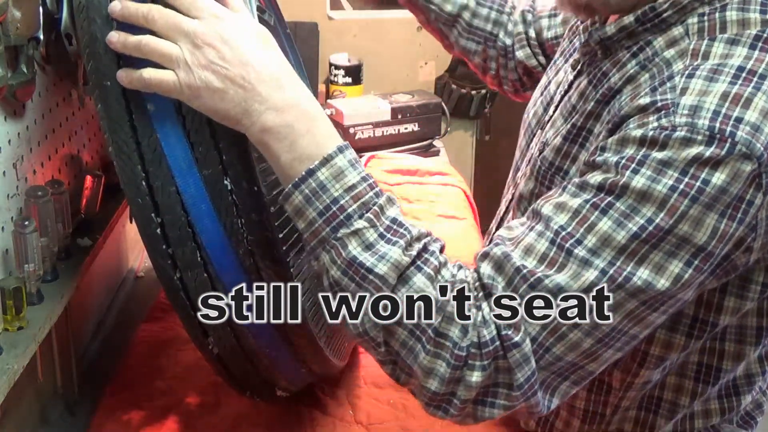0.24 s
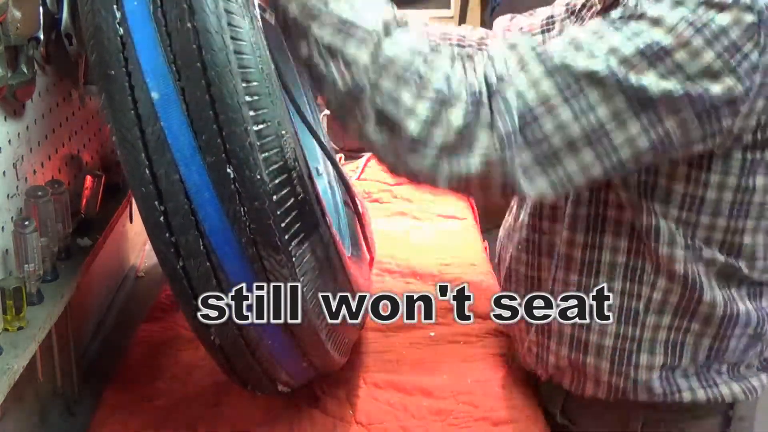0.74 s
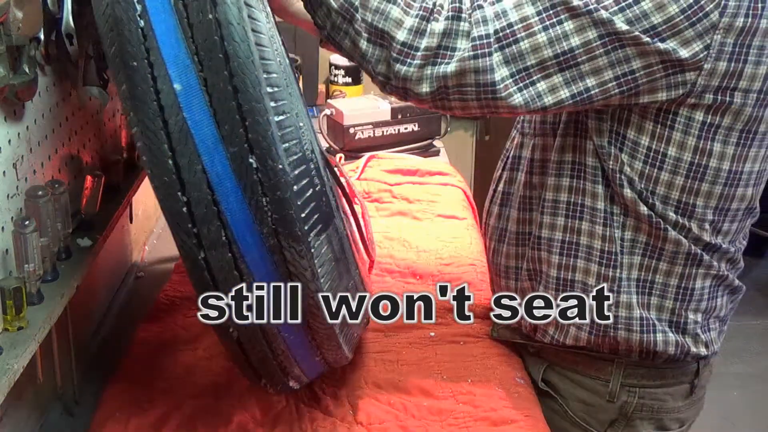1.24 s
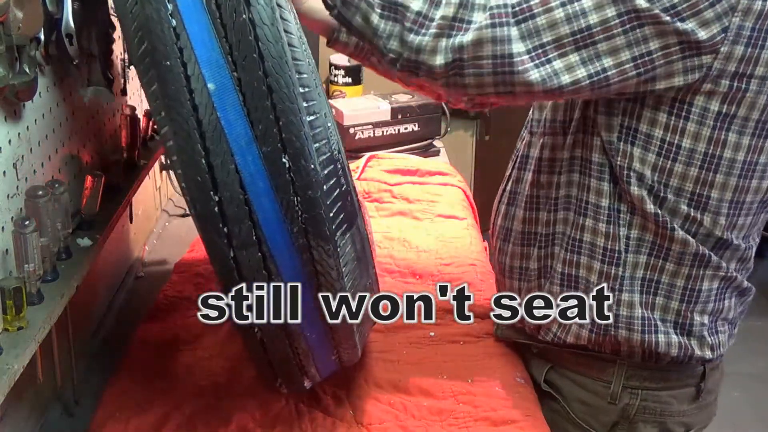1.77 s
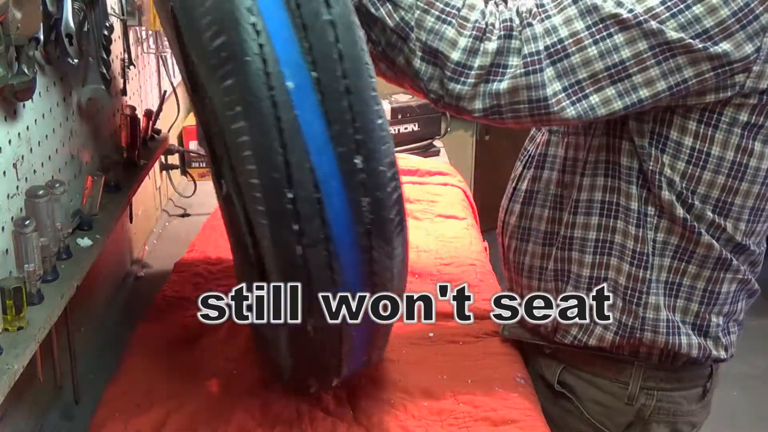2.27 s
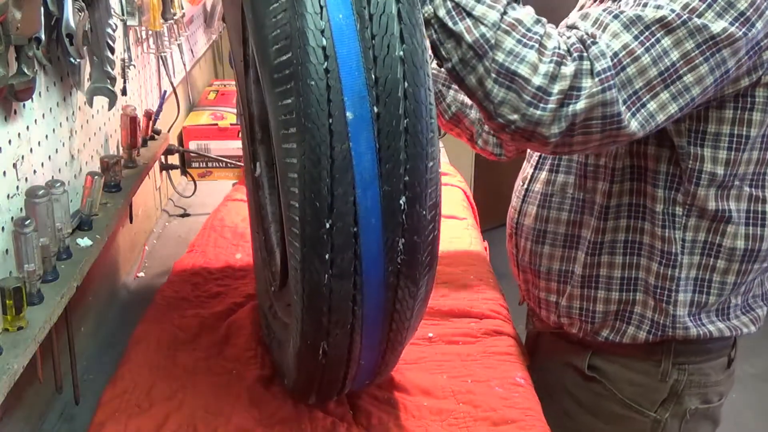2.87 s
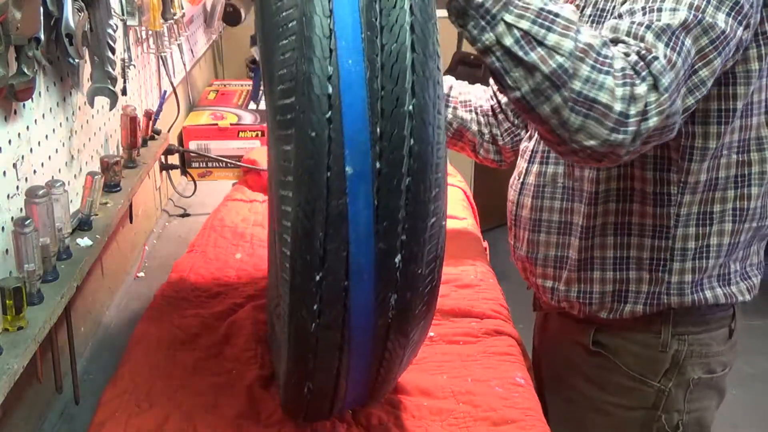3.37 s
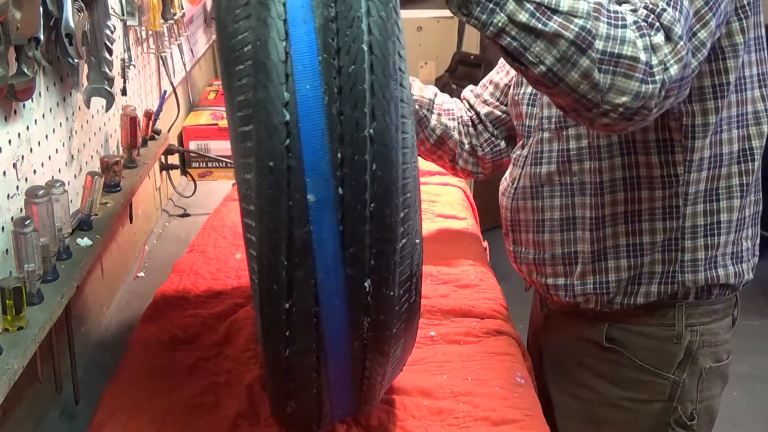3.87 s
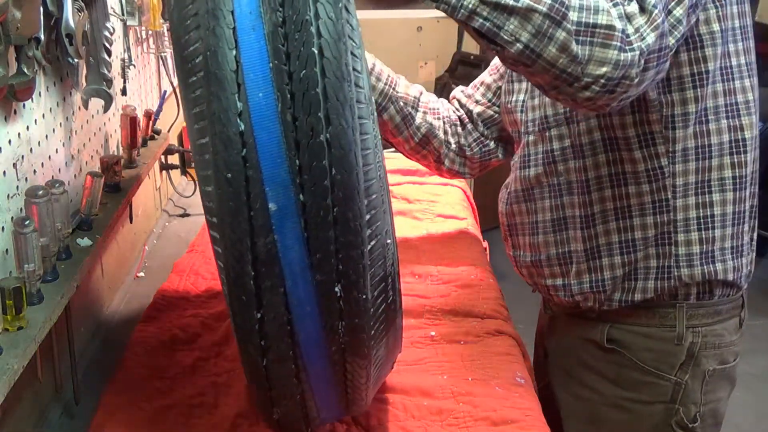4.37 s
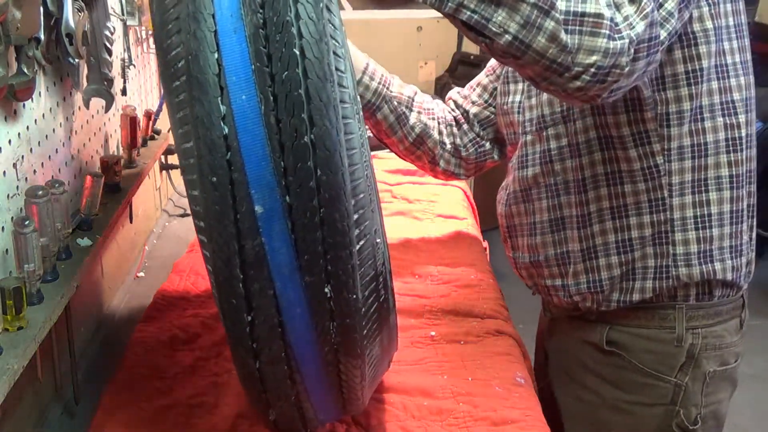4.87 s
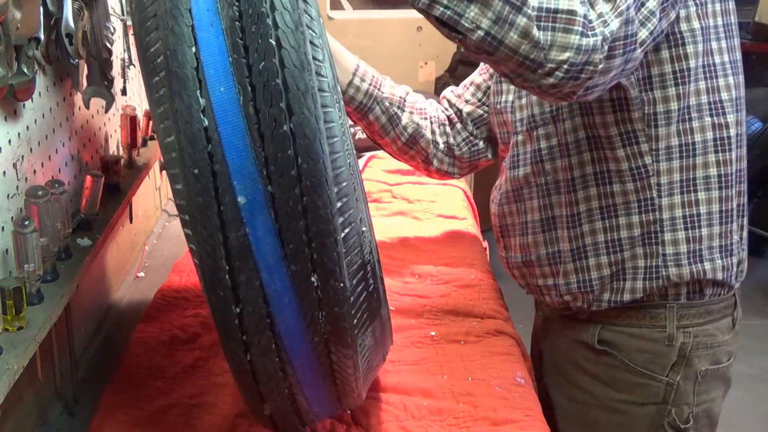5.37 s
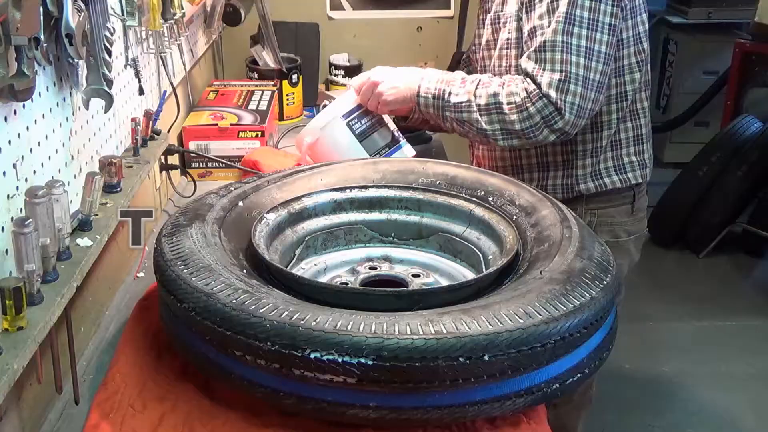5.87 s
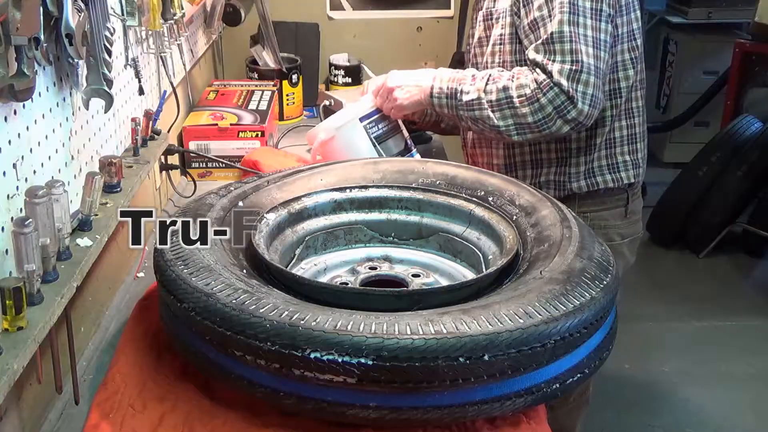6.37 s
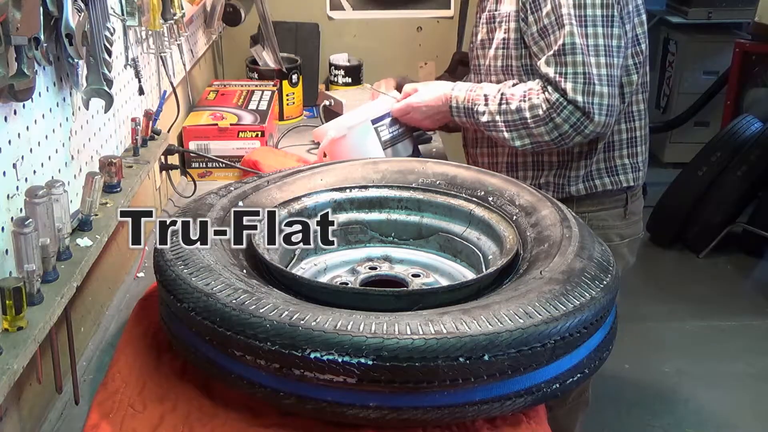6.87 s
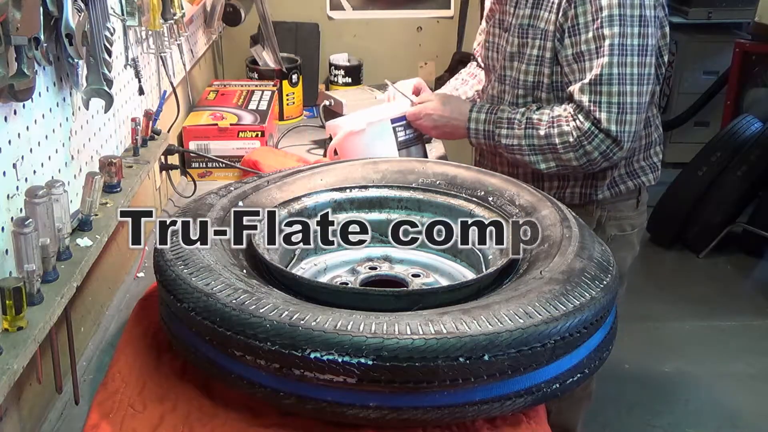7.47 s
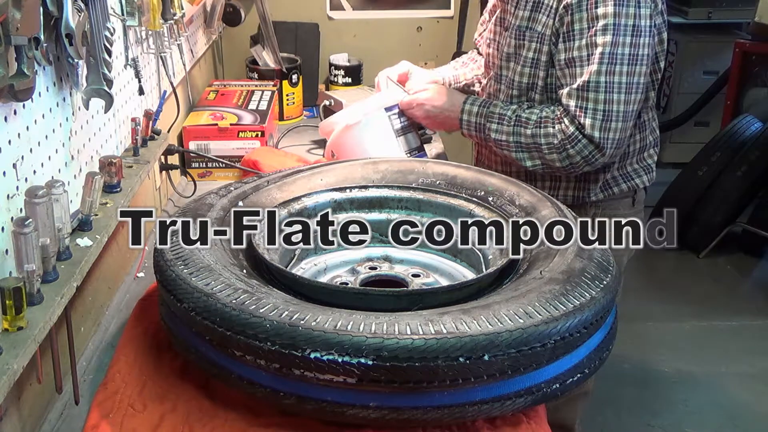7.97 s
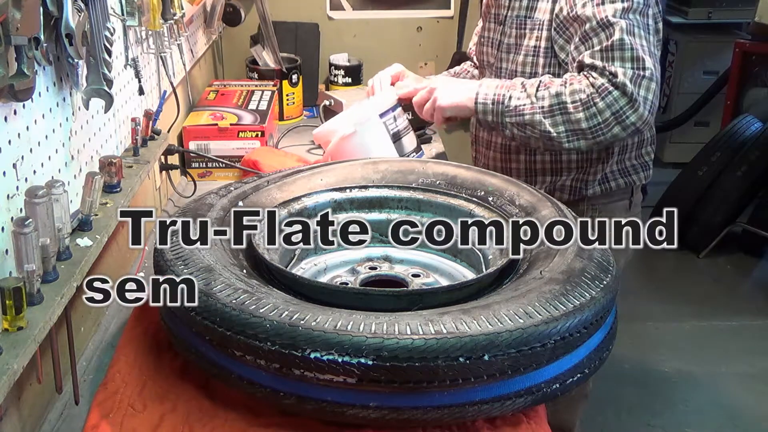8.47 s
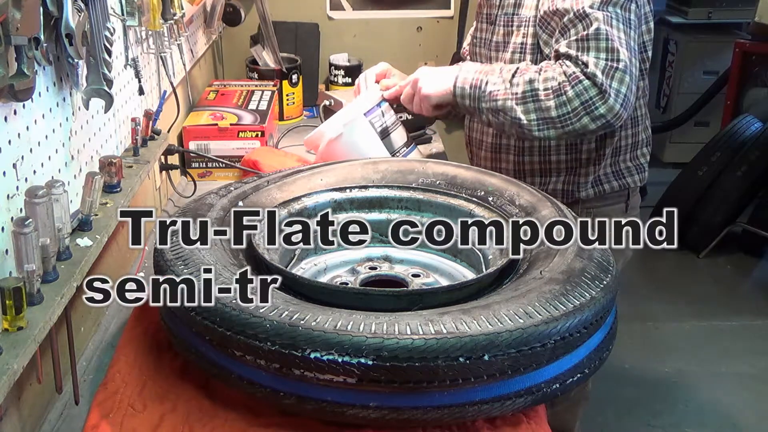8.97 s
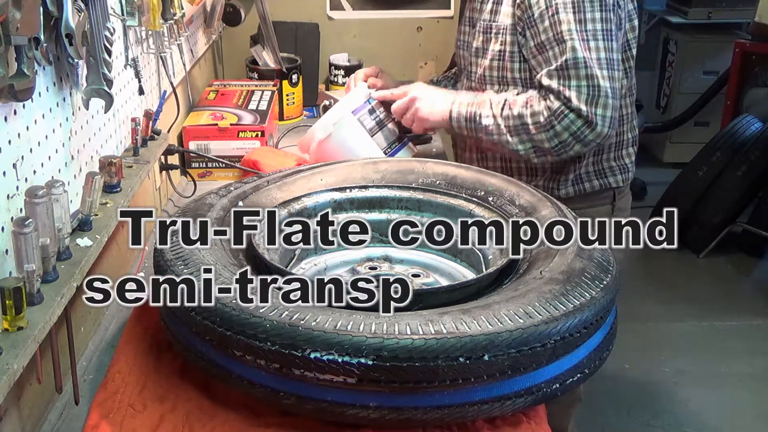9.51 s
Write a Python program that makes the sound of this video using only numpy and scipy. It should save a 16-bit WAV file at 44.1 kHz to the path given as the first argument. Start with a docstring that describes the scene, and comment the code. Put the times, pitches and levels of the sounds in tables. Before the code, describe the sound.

A piston pump inflating a tyre fills the first six seconds with fast hammering drone, harsh rattle and high piercing squeaks, nearly constant in level. It breaks off almost instantly. The quiet workshop remains: soft air, mains hum, faint thin electronic whine. Hollow plastic ticks and light rubbing follow, then a loud crack with a puff of air, and later scattered clicks and muffled thuds, picked up fairly close in slight stereo width.

```python
"""First a small piston air compressor pumps up a tyre on a garage workbench: a drone, a clatter and squeals,
all computed from one crank, whose turns knock the housing, rattle the drive and make the pump squeal.
It breaks off abruptly; in the quiet garage a plastic bottle is handled, with clicks, rubs and soft bumps made
of shaped noise and tones, and one loud snap and hiss. Behind it all lie soft air, mains hum and a faint
electrical whine. Reflections give the two channels their width, and the recorder cuts the top."""
import sys
import numpy as np
from scipy import signal
from scipy.fft import rfft, irfft, next_fast_len
from scipy.io import wavfile
from scipy.ndimage import uniform_filter1d

SR = 44100
rng = np.random.default_rng(int(sys.argv[2]) if len(sys.argv) > 2 else 0)


def int16_out(signal):
    """Quantize to a 16-bit WAV file."""
    q = np.round(np.clip(np.atleast_2d(signal).T, -1, 1) * 32767)
    wavfile.write(sys.argv[1], SR, q.astype(np.int16))


N = 429534
T = np.arange(N) / SR

# housing drone: (multiple of the crank rate, relative level [dB])
DRONE_HARMONICS = [(1, -31), (2, -7), (3, -18), (4, -20), (5, -19), (6, -9), (7, -10.5), (8, 2), (9, -1),
                   (10, -9.5), (11, 1), (12, 0), (13, -8), (14, -4.5), (15, -15), (16, -1.5), (17, -15),
                   (18, -14), (19, -35), (20, -11.5), (21, -26), (22, -9.5), (23, -15.5), (24, -16.5)]
# knocks of piston and valves within a turn: (crank angle [turns], relative level [dB])
KNOCKS = [(.11, -0.5), (0.369, -9.5), (0.749, -6), (.85, -1.5)]
# squeaks within a turn: (nominal pitch [Hz], crank angle [turns], swell width [turns], relative level [dB])
LOW_SQUEAKS = [(2504, 0.47, 0.68, -6.5), (2581, 0.24, 0.24, -2), (2539, 0.613, 0.12, 2.5),
               (2376, 0.22, 0.085, -4), (2640, 0.92, 0.033, -6), (2185, 0.69, 0.14, -17.5)]
MID_SQUEAKS = [(7390, 0.28, 0.15, -7.5), (7724, 0.32, 0.1, 1), (7874, 0.605, 0.07, -2.5),
               (5040, 0.54, 0.1, -7), (3540, 0.9, 0.085, -11)]
HIGH_SQUEAKS = [(10220, 0.556, 0.041, 1.5), (10236, 0.48, 0.16, 0)]
TOP_SQUEAKS = [(12780, .37, 0.06, 0), (4975, .58, 0.1, -6)]
# course of the low squeal: (time [s], level [dB])
LOW_SQUEAL_LEVEL = [(0.0, -26), (0.44, -23.5), (1.15, -29), (1.5, -25), (2.05, -29.5), (2.5, -25),
                    (2.9, -27.5), (5.88, -27.5)]
# colour of the clatter: (frequency [Hz], relative level per Hz [dB])
CLATTER_COLOUR = [(30, -18), (170, -11), (280, -3), (450, 3.5), (830, 2), (980, -4.5), (1400, -3),
                  (1750, -6), (2300, 2), (3000, -2.5), (4300, -6), (6500, -6), (7800, 0), (12500, -2.5),
                  (13500, -5.5), (16000, -17)]
# ringing metal parts: (frequency [Hz], width [Hz], mean gain [dB])
METAL_PARTS = [(2178, 47, -3), (3566, 170, -2.5), (5000, 400, -3.5), (7430, 38, 3), (10140, 400, 3.5),
               (10800, 87, -2.5), (11600, 21, 8.5)]
# clicks of the plastic: (time [s], relative level [dB], pitch [Hz], ring t60 [s], rise [s],
# ring of the whole bottle [dB])
CLICKS = [(6.245, -43, 6000, .08, .0005, -8), (6.71, -44, 3500, .08, .001, -6),
          (7.0667, -27, 3700, 0.039, .0001, -13), (7.079, -21.5, 3600, 0.077, .0002, -15),
          (7.3205, -39.5, 3800, .06, .0002, -4), (8.658, -31, 2420, .12, .0002, -9),
          (8.863, -41, 3000, .09, .0003, 1), (9.1085, -27, 4300, 0.12, .0002, 1.5),
          (9.171, -32.5, 2600, 0.14, .0005, -2), (9.187, -32, 1700, .1, .001, -5),
          (9.318, -36, 2820, 0.083, .002, 2), (9.328, -37.5, 4600, .1, .001, 5.5),
          (9.558, -43, 4400, .04, .0005, -12), (9.624, -29, 2400, 0.11, 0.0033, 1.5)]
# the hollow bottle's resonances: (frequency [Hz], nominal width [Hz], relative level [dB])
BOTTLE_MODES = [(660, 88, 5.5), (1530, 200, 1), (2150, 270, 0), (3000, 380, 0), (4720, 628, -1.5),
                (6900, 1400, -5.5), (10800, 1900, -4.5)]
# bumps on the bench: (time [s], relative level [dB], nominal upper edge [Hz], thud t60 [s],
# boom of the bench top [dB])
BUMPS = [(5.926, -44, 600, 0.14, 0), (7.117, -50, 220, 0.19, 1), (7.644, -46, 400, .3, 1.5),
         (8.868, -54, 500, 0.21, -2), (9.118, -48, 130, .2, 8), (9.186, -37, 700, 0.18, -7),
         (9.32, -39.5, 280, 0.22, 3), (9.621, -34.5, 480, 0.15, -3)]
# rubs of hand and sleeve: (time of the middle [s], level [dB], half-length [s], pitch [Hz])
RUBS = [(6.254, -64, .05, 3000), (6.705, -69, .03, 3000), (7.062, -51, 0.023, 3900),
        (7.086, -45, 0.012, 3500), (7.129, -50.5, 0.034, 2170), (7.23, -61, .03, 8000),
        (8.028, -58, .025, 2800), (8.165, -55, 0.022, 3800), (9.55, -62, 0.098, 7050)]
# colour of the escaping air: (frequency [Hz], relative level per Hz [dB])
HISS_COLOUR = [(59, -36), (100, -3), (132, -17), (206, -28), (328, -9), (442, -21), (502, -18), (1100, -10),
               (1310, -15.5), (2800, -0.5), (6150, 3), (13800, -13), (16000, -44)]
# colour of the quiet garage's air: (frequency [Hz], relative level per Hz [dB])
QUIET_COLOUR = [(15, -40), (25, -6), (240, -5), (410, -6.5), (722, -6), (2360, -10), (3170, -9.5),
                (6920, -16.5), (11800, -15.5), (14300, -22), (15500, -18)]
# mains hum: (frequency [Hz], rms level [dB])
HUM = [(120, -75), (240, -71), (360, -74.5), (720, -73), (840, -84), (960, -76)]
# reflections that differ between the channels: (frequency [Hz], side gain [dB])
WIDTH = [(60, -33), (110, -5), (200, -10), (380, -11), (700, -7), (1290, -5.5), (2380, -8.5), (4400, -7.5),
         (8120, -11.5), (15000, -13.5)]

STOP_S = 5.897
MAINS_HZ = 60
# the crank creeps up to full speed: turns per second, shortfall at first, time constant
CRANK_HZ, CRANK_LAG_HZ, SETTLE_S = 37.985, 0.12, 2.2
# housing drone and clatter at the start; both ease slightly as the pump runs
DRONE_DB, CLATTER_DB, EASE_DB_PER_S = -25.1, -20.5, 0.1044
# the middle squeal builds up and dies back around a peak
MID_PEAK_S, MID_PEAK_DB, MID_RISE_DB_PER_S, MID_FALL_DB_PER_S = 3.5, -31, 1.4, 3.5
# the high squeal: level, dB gained per dB the low squeal loses, growth as the pump runs
HIGH_SQUEAL_DB, SQUEAL_TRADE, HIGH_GROWTH_DB_PER_S = -27, 0.4, 0.6
# the top squeal catches for one spell: from, until, level then, level otherwise, time to catch
TOP_FROM_S, TOP_UNTIL_S, TOP_SPELL_DB, TOP_IDLE_DB, TOP_CATCH_S = 0.85, 2.4, -32.3, -41.5, 0.25
# the bottle's snap: time, level of each tone at the onset
SNAP_S, SNAP_DB = 7.6268, -8
# the hiss after the snap: level before dulling, hold, then fall
HISS_DB, HISS_HOLD_S, HISS_FALL_DB_PER_S = -21.5, 0.041, 315
QUIET_DB = -59
TOP_HZ = 16000


def undb(db):
    """Decibels to gain."""
    return 10 ** (np.asarray(db) / 20)


def unit(x):
    """Scale to rms 1."""
    return x / np.sqrt(np.mean(x ** 2))


def curves(table):
    """Each column of a table, joined by straight lines in time."""
    s, *columns = np.transpose(table)
    return [np.interp(T, s, c) for c in columns]


def colour(x, points):
    """Filter by a spectrum of (frequency [Hz], gain [dB]) points."""
    size = next_fast_len(len(x))
    hz, db = np.transpose(points)
    f = np.maximum(np.fft.rfftfreq(size, 1 / SR), 1)
    gain = undb(np.interp(np.log(f), np.log(hz), db))
    return irfft(rfft(x, size) * gain, size)[:len(x)]


def ring(x, hz, width):
    """One resonance, gain 1 at its centre."""
    hz = min(hz, SR / 2 - 1000)
    sharpness = hz / min(width, SR / np.pi)
    return signal.lfilter(*signal.iirpeak(hz, sharpness, fs=SR), x)


def ring_twice(x, hz, width):
    """The same resonance passed twice, for steeper flanks."""
    return ring(ring(x, hz, width), hz, width)


def noise(size=N):
    """White noise."""
    return rng.standard_normal(size)


def walk(rate):
    """Smooth chance with spread near 1, changing rate times a second."""
    step = int(SR / rate)
    knots = noise(N // step + 2)
    path = np.interp(np.arange(N) / step, np.arange(len(knots)), knots)
    return uniform_filter1d(path, step // 2) * np.sqrt(2)


def window(turns, angle, length):
    """A smooth swell once a turn around an angle."""
    offset = (turns - angle + .5) % 1 - .5
    return np.exp(-.5 * (offset / length) ** 2)


def add(track, s, x):
    """Mix a short sound in at time s."""
    i = int(s * SR)
    track[i:i + len(x)] += x[:N - i]


def compressor():
    """Drone, clatter and squeals all follow the crank."""
    turns = crank()
    body = undb(DRONE_DB) * drone(turns) + undb(CLATTER_DB) * clatter(turns)
    out = undb(-EASE_DB_PER_S * T) * body

    low_db, = curves(LOW_SQUEAL_LEVEL)
    out += undb(low_db) * squeal(turns, LOW_SQUEAKS, drift=0.72, rough=0.17, waver_db=0.5)

    mid_loss = np.maximum(MID_RISE_DB_PER_S * (MID_PEAK_S - T), MID_FALL_DB_PER_S * (T - MID_PEAK_S))
    mid_db = MID_PEAK_DB - mid_loss
    out += undb(mid_db) * squeal(turns, MID_SQUEAKS, drift=0.58, rough=0.39, waver_db=1.0)

    high_db = HIGH_SQUEAL_DB - SQUEAL_TRADE * (low_db - low_db.mean())
    high_db = high_db + HIGH_GROWTH_DB_PER_S * (T - STOP_S / 2)
    out += undb(high_db) * squeal(turns, HIGH_SQUEAKS, drift=0.47, rough=0.27, waver_db=1.15)

    spell = np.clip(np.minimum(T - TOP_FROM_S, TOP_UNTIL_S - T) / TOP_CATCH_S + .5, 0, 1)
    top_db = TOP_IDLE_DB + (TOP_SPELL_DB - TOP_IDLE_DB) * spell
    out += undb(top_db) * squeal(turns, TOP_SQUEAKS, drift=.8, rough=.6, waver_db=1.2)
    return out


def crank():
    """Turns of the crank so far: it settles towards full speed and wanders a little."""
    hz = CRANK_HZ - CRANK_LAG_HZ * np.exp(-T / SETTLE_S) + 0.012 * walk(3)
    return np.cumsum(hz) / SR


def drone(turns, scatter=0.73, throb_depth=0.093):
    """The knocks of each turn keep the housing ringing on multiples of the crank rate."""
    angle = np.linspace(0, 1, 2048)
    cycle = 0
    for k, db in DRONE_HARMONICS:
        push = sum(undb(knock_db) * np.exp(-2j * np.pi * round(k) * at) for at, knock_db in KNOCKS)
        # each panel answers a little early or late (scatter in radians)
        lag = np.angle(push) + scatter * rng.standard_normal()
        cycle = cycle + undb(db) * np.cos(2 * np.pi * round(k) * angle + lag)
    housing = unit(np.interp(turns % 1, angle, cycle))
    # the motor throbs at twice the mains frequency
    throb = 1 + throb_depth * np.sin(2 * np.pi * MAINS_HZ * 2 * T)
    gear_ratio = 25 / 3
    motor = undb(-18.0) * np.sin(2 * np.pi * gear_ratio * turns)
    return housing * throb * undb(.5 * walk(30)) + motor


def clatter(turns, repeat=0.43, creep=0.73, slack_depth=0.29, load_depth=0.076, mains_depth=0.049, grit_db=1.0):
    """Gears and bearings rattle, partly the same on every turn, and ease off while the piston is unloaded."""
    # the contact creeps between worn parts, so single overtones swell and fade
    worn = unit(wear(turns) + creep * (walk(1.46) * wear(turns) + walk(2.486) * wear(turns)))
    # the repeating part is weaker in the lows and in the finest rattle
    worn = colour(worn, [(300, -3.5), (700, -4.5), (960, 0.5), (7800, 1.5), (9000, -5.5)])
    loose = noise() * undb(grit_db * walk(1500))
    rattle = np.sqrt(repeat) * worn + np.sqrt(1 - repeat) * loose
    load = 1 - slack_depth * window(turns, 0.38, 0.14) + load_depth * window(turns, 0.84, 0.083)
    # the motor's torque throbs at twice the mains frequency
    torque = 1 + mains_depth * np.sin(2 * np.pi * MAINS_HZ * 2 * T)
    rattle = rattle * load * torque
    metal = sum(undb(db + 2 * walk(3.06)) * ring(rattle, hz, width) for hz, width, db in METAL_PARTS)
    return unit(colour(rattle + metal, CLATTER_COLOUR))


def wear(turns):
    """The roughness of a worn part, read once round the crank."""
    size = int(SR / CRANK_HZ)
    # equally strong overtones in random phase, drawn on a grid eight times finer
    surface = unit(irfft(np.exp(2j * np.pi * rng.random(size // 2)), size * 8))
    return np.interp(turns % 1, np.linspace(0, 1, len(surface)), surface)


def squeal(turns, squeaks, drift, rough, waver_db):
    """Squeaks return at the same crank angles; their phase drifts slowly and trembles fast (radians)."""
    out = 0
    for hz, angle, length, db in squeaks:
        # a whole number of cycles in each turn
        cycles = round(hz / CRANK_HZ)
        slip = 2 * np.pi * rng.random() + drift * walk(1.49) + rough * walk(90)
        out = out + undb(db) * window(turns, angle, length) * np.sin(2 * np.pi * cycles * turns + slip)
    # even out the level over a quarter second, then let it waver
    out = out / np.sqrt(uniform_filter1d(out ** 2, SR // 4) + 1e-9)
    return out * undb(0.96 * walk(45) + waver_db * walk(7))


def snap(dulling_s=0.056):
    """The bottle snaps open and lets out a short hiss that dulls as it dies."""
    # the air sputters as it squeezes through the gap
    air = unit(colour(noise() * undb(1.3 * walk(1200)), HISS_COLOUR))
    dull = signal.sosfilt(signal.butter(4, 7000, fs=SR, output="sos"), air)
    # the fast first air adds a bright edge of its own
    edge = unit(colour(noise(), [(5000, -28), (7500, 3), (13000, -5), (16000, -22)]))
    force = np.exp(-(np.maximum(T - SNAP_S, 0) / dulling_s) ** 2 / 2)
    hiss_db = HISS_DB - HISS_FALL_DB_PER_S * np.maximum(T - SNAP_S - HISS_HOLD_S, 0)
    out = (dull + undb(-7.0) * force * edge) * undb(hiss_db) * (T > SNAP_S)
    t = T[:SR // 100]
    crack = np.sin(2 * np.pi * 3900 * t) * np.exp(-t / 0.00046)
    crack += np.sin(2 * np.pi * 11500 * t) * np.exp(-t / 0.00027)
    add(out, SNAP_S, undb(SNAP_DB) * crack)
    return out


def handling():
    """Plastic clicks ring the bottle; dull bumps shake the bench; hand and sleeve rub softly."""
    out, t = np.zeros(N), T[:SR // 2]
    for s, *settings in CLICKS:
        add(out, s, click(t, *settings))
    for s, *settings in BUMPS:
        add(out, s, bump(t, *settings))
    for s, *settings in RUBS:
        add(out, s - t[-1] / 2, rub(t, *settings))
    return out


def click(t, db, hz, t60, rise, shell_db, ring_width=0.18, crack_db=-13, tick_db=3):
    """A flexing wall rings at its own pitch, with the hollow bottle and a bright crack."""
    # the crack's treble dies sooner than the ring
    crack = colour(noise(len(t)), [(400, 0), (11500, 6), (15500, -12)]) * undb(-30 * t / t60)
    shell = unit(sum(undb(mode_db) * ring_twice(noise(len(t)), f, 2 * width)
                     for f, width, mode_db in BOTTLE_MODES))
    spot = unit(ring_twice(noise(len(t)), hz, 2 * ring_width * hz))
    tick = 1 + undb(tick_db) * np.exp(-t / 0.00088)
    fade = undb(-60 * t / t60) * tick * (1 - np.exp(-t / rise))
    return undb(db - 8.5) * (undb(-6.5) * spot + undb(shell_db) * shell + undb(crack_db) * crack) * fade


def bump(t, db, hz, t60, boom_db, bench_hz=80):
    """A dull thud of low noise, with the bench top booming at one low pitch."""
    thud = colour(noise(len(t)), [(25, -25), (85, 0), (hz * 0.68, -2), (hz * 2.4, -18), (hz * 15, -48)])
    bench = undb(boom_db) * np.sin(2 * np.pi * bench_hz * t) * undb(-50 * t / t60)
    return undb(db + 2.5) * (unit(thud) * undb(-60 * t / t60) + bench) * (1 - np.exp(-t / 0.0036))


def rub(t, db, length, hz):
    """Grainy friction noise around one pitch swells and fades smoothly."""
    scrape = ring(noise(len(t)) * undb(2.5 * walk(900)[:len(t)]), hz, 0.83 * hz)
    return undb(db) * unit(scrape) * np.exp(-((t - t[-1] / 2) / length) ** 2)


def garage():
    """Soft air and mains hum, with a thin pulsing whine of electronics."""
    mid, side = (unit(colour(noise(), QUIET_COLOUR)) for _ in range(2))
    air = undb(QUIET_DB) * (mid + undb(-5.5) * side * np.array([[1], [-1]]))
    hum = sum(undb(db) * np.sqrt(2) * np.sin(2 * np.pi * (hz * T + rng.random())) for hz, db in HUM)
    # one tone pulses 29.97 times a second, one four times as fast, one is steady
    pulses = 29.97 * (T - 7.937)
    whine = undb(-54) * window(pulses, 0, 0.05) * np.sin(2 * np.pi * 3192 * T)
    whine += undb(-59.5) * window(4 * pulses, 0, 0.15) * np.sin(2 * np.pi * 11998 * T + .7 * walk(120))
    whine += undb(-69) * np.sin(2 * np.pi * 15734 * T)
    return air + hum + whine


def spread(x, wall_t60):
    """Reflections from bench and walls differ between the ears and give a sound its width."""
    t = T[:SR // 2]
    walls = noise(len(t)) * undb(-60 * t / wall_t60)
    reflected = signal.fftconvolve(x, walls / np.linalg.norm(walls))[:N]
    side = colour(reflected, WIDTH)
    return x + side * np.array([[1], [-1]])


def scene(tail_db=-22, tail_t60=0.14):
    """The compressor breaks off with only a brief faint tail; the small sounds follow in the quiet."""
    running = np.clip((STOP_S - T) / 0.0048 + .5, 0, 1)
    tail = undb(tail_db - 60 * np.maximum(T - STOP_S, 0) / tail_t60)
    machine = spread(compressor(), wall_t60=0.67) * np.maximum(running, tail)
    bottle = spread(handling() + snap(), wall_t60=0.053)
    return machine + bottle + garage()


def record(dry):
    """The recorder cuts the top with a steep low-pass filter."""
    return signal.sosfilt(signal.ellip(10, .1, 80, TOP_HZ, fs=SR, output="sos"), dry)


dry = scene()
out = record(dry)
int16_out(out)
```